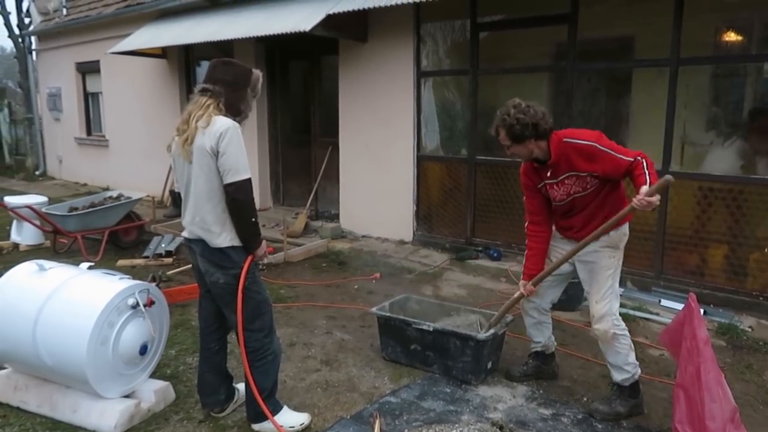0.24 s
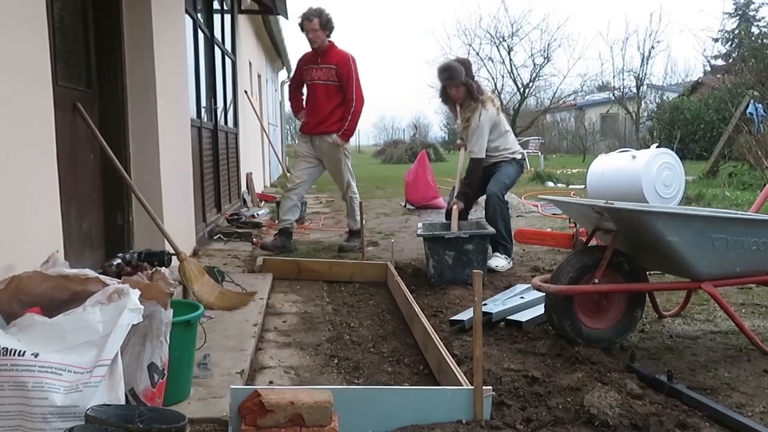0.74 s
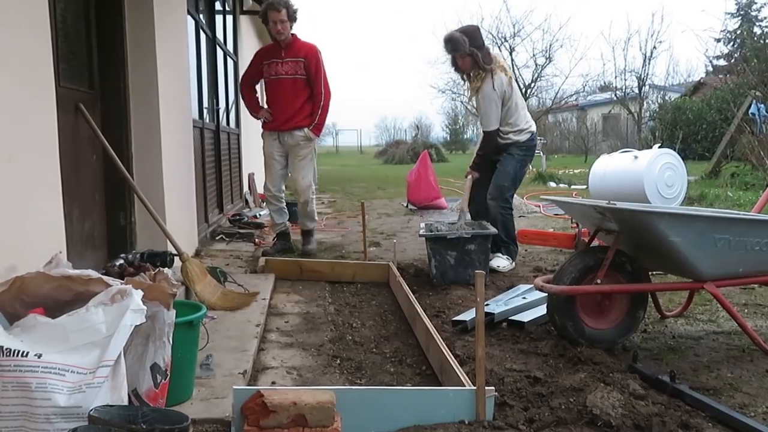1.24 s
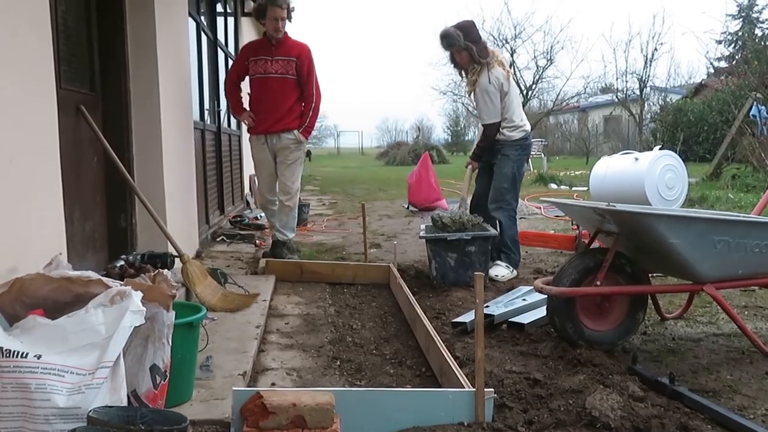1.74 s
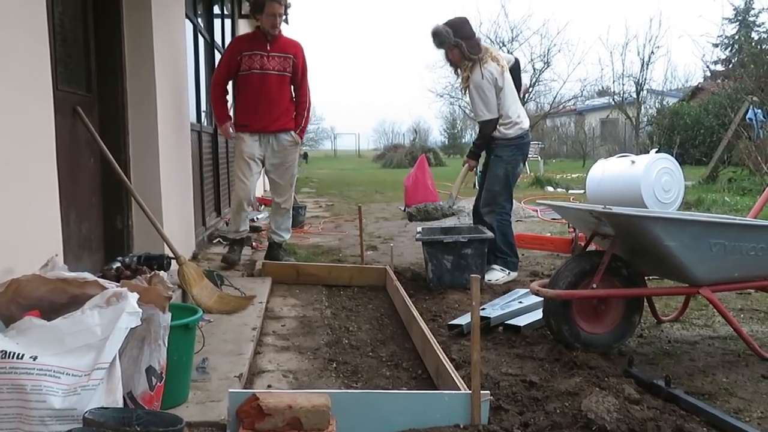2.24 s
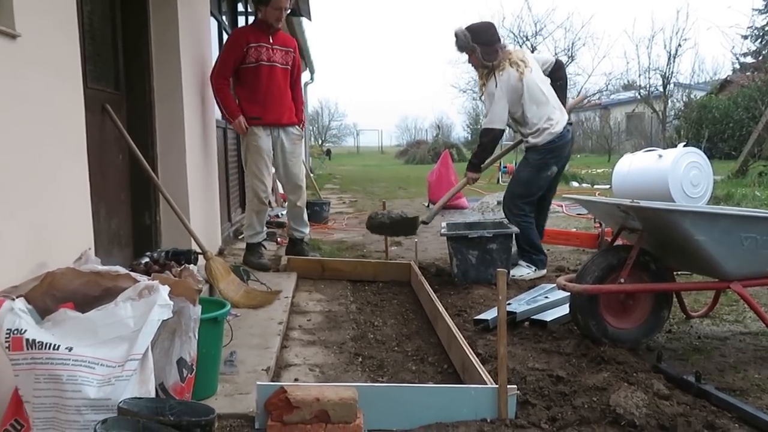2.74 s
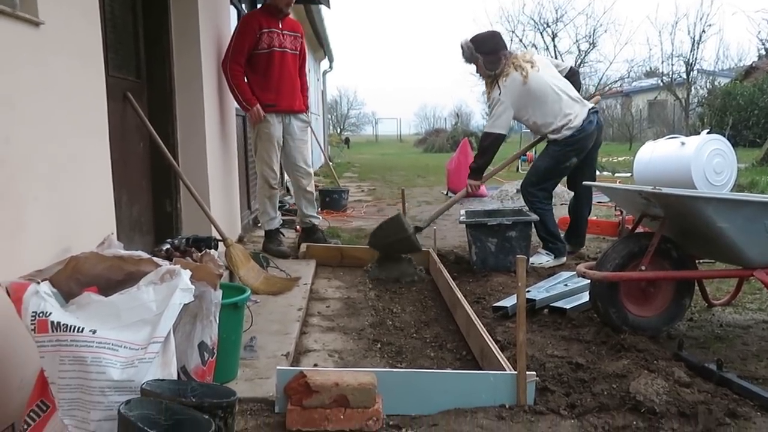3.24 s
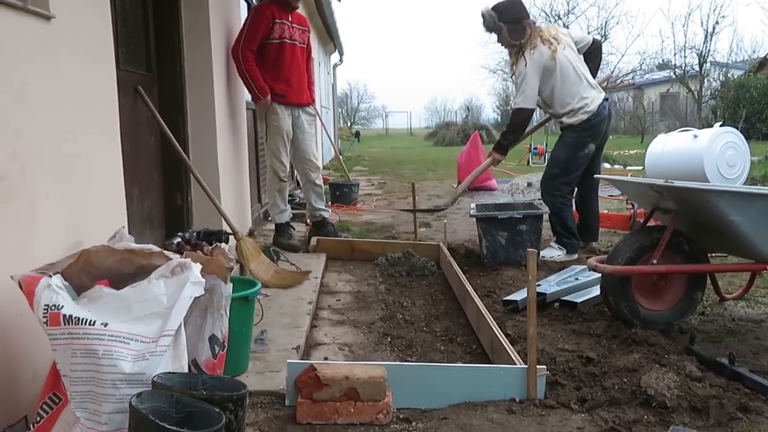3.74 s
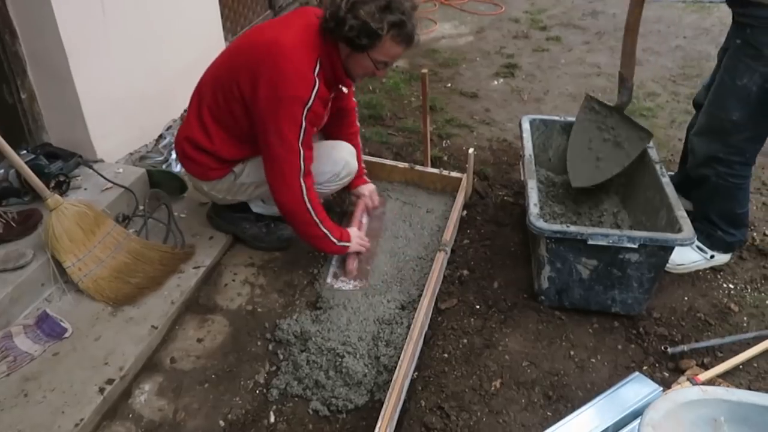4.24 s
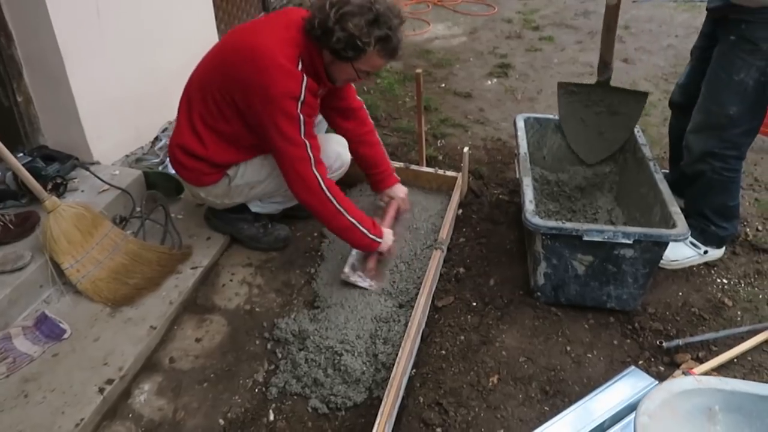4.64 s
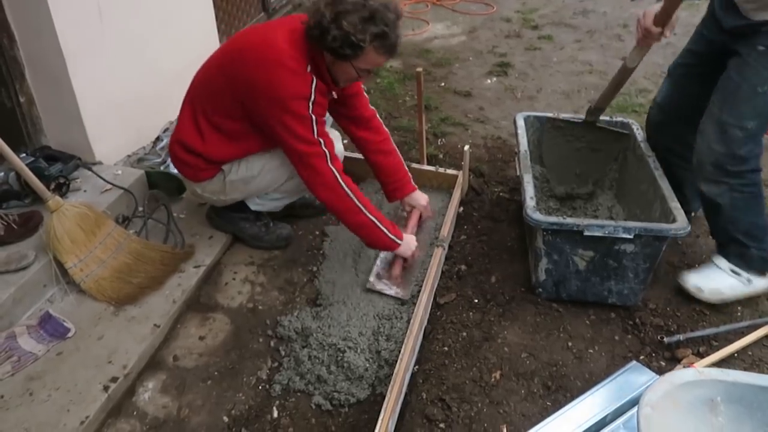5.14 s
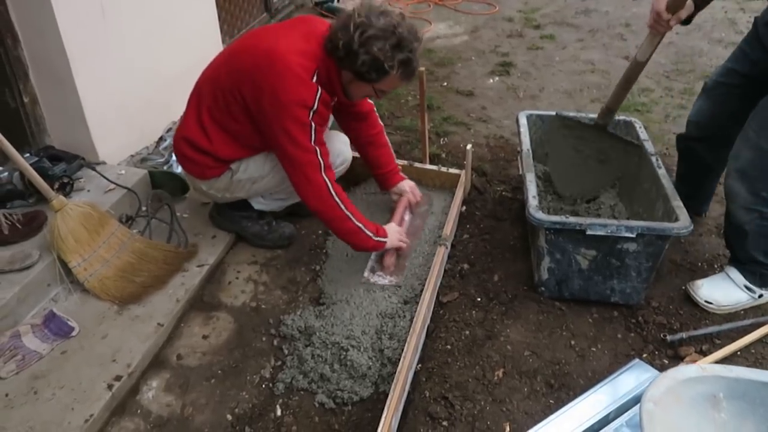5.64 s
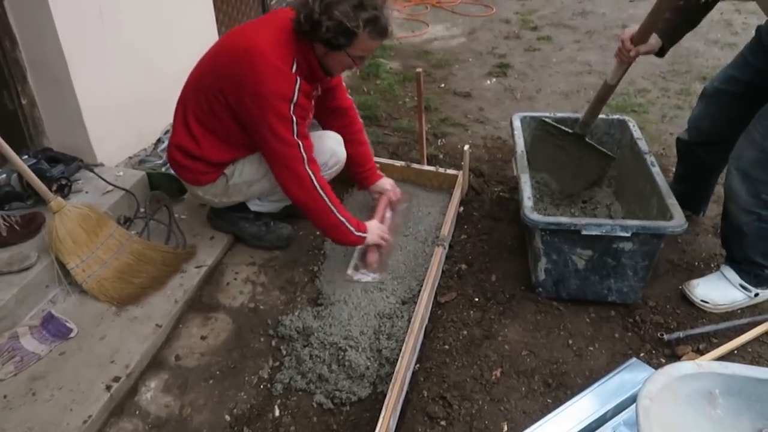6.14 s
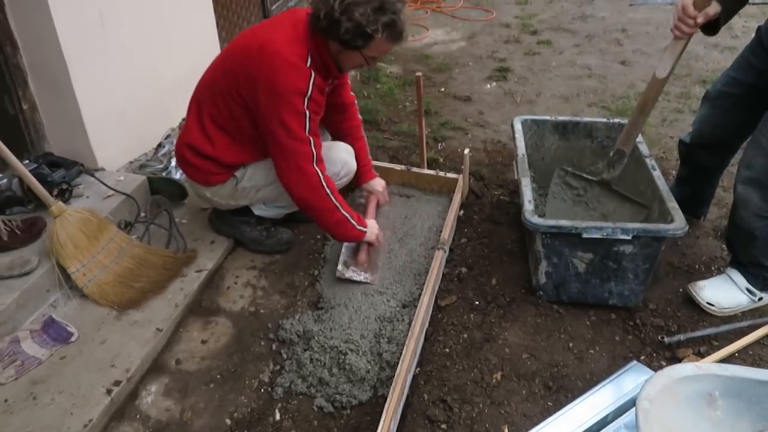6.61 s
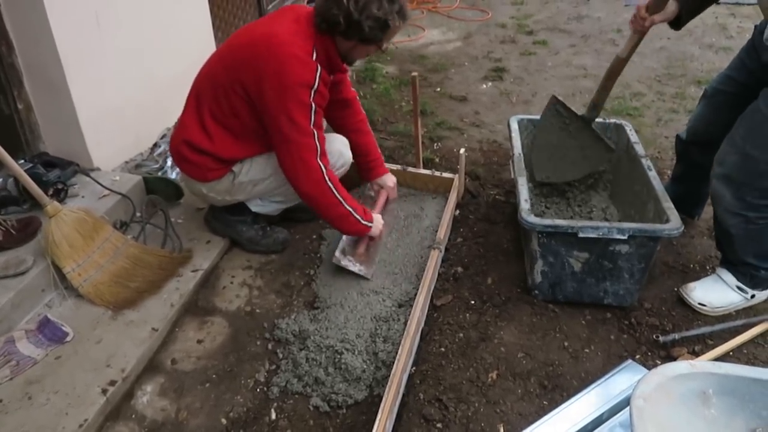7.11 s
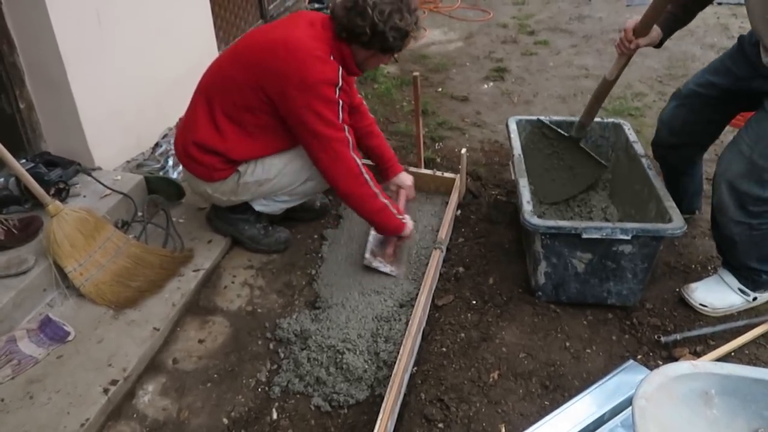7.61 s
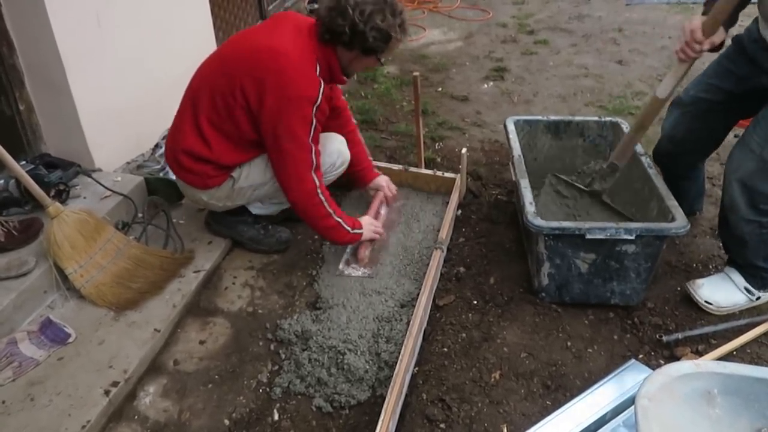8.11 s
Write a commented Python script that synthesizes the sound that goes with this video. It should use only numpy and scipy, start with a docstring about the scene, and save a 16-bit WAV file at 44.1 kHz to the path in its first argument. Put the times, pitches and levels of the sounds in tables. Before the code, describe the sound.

Outdoors, low far traffic rumbles softly. From 0 to 1.3 s a shovel at some distance scrapes gravel and wet concrete in several short coarse strokes, with dull hollow knocks on a plastic tub. From 1.4 to 3 s it is quieter: a small blade tap, a thump near 1.8 s, faint grit and short rubs. Around 3.2 s a loud harsh scrape slides the load out, followed by metallic blade taps at 3.4 and 3.6 s. At 3.95 s the sound cuts to close range, the rumble drops, and a steel trowel sweeps wet concrete in quick, uneven, sandy strokes, two or three a second, until 8.4 s. Underneath, the shovel digs on, the tub booming and knocking, strongly at 6.0 and 6.5 s, with brief stony squeaks near 7.3 s. The trowel rings faintly at 7.9 s, then a hard clustered knock lands at 8.15 s.

```python
"""Shovel and trowel in a yard

In a yard a shovel works gravel and wet concrete in a plastic tub and tips a load out; then, heard from close by,
a steel trowel sweeps the concrete in quick strokes while the shovel digs on and knocks the tub.
Stones scrape steel as dense random clicks under sand fizz; the tub booms as filtered clicks, and knocks
and steel ring as dying sines. Far traffic, slow-filtered noise, rumbles underneath.
"""
import sys
import numpy as np
from scipy import signal
from scipy.io import wavfile
from scipy.ndimage import uniform_filter1d

SR = 44100
rng = np.random.default_rng(int(sys.argv[2]) if len(sys.argv) > 2 else 0)


def pcm_store(signal):
    """Save signal as 16-bit PCM."""
    levels = np.round(np.clip(np.atleast_2d(signal), -1, 1) * 32767)
    wavfile.write(sys.argv[1], SR, levels.astype(np.int16).T)


N = 369116
T = np.arange(N) / SR
CLOSE_S = 3.943  # up to here the shovel is heard from afar, from here on the trowel close by

# The blade knocks the tub: (time [s], peak of the ring [dB], pitch [Hz], t60 [s],
# low thud before a 1 dB cut [dB], slap of wet stones over the knock [dB])
KNOCKS = [(0.258, -24, 167, 0.21, -45, -21), (0.305, -21.5, 158, 0.13, -47, -23),
          (0.515, -31, 290, 0.071, -56, -15), (0.61, -29.5, 200, 0.077, -49, -15),
          (0.801, -26, 205, 0.1, -55, -10), (1.101, -26, 284, 0.18, -47, -11),
          (1.767, -34, 242, 0.12, -41, -24), (4.422, -31, 408, 0.12, -42, -18),
          (4.485, -24.5, 607, 0.14, -43, -15), (4.605, -30, 505, 0.14, -54, -15),
          (4.804, -22, 380, 0.15, -41, -17), (5.058, -34, 360, 0.12, -51, -9),
          (5.444, -40, 545, 0.1, -52, -15), (5.744, -35, 152, 0.21, -50, -13),
          (5.958, -21.5, 320, 0.16, -28.5, -17), (6.267, -25, 572, 0.1, -44, -7),
          (6.469, -16, 393, 0.15, -52, -15), (6.582, -26, 334, 0.12, -50, -18),
          (6.609, -17, 354, 0.092, -49, -15), (6.768, -33, 262, 0.11, -39, -15),
          (6.856, -39, 312, 0.09, -42, -17), (7.252, -23, 163, 0.1, -31, -8),
          (7.35, -20.5, 254, 0.14, -36, -15), (7.494, -28, 306, 0.058, -58, -15),
          (8.044, -25, 510, 0.16, -55, -19), (8.111, -10, 535, 0.12, -48, -24),
          (8.123, -12.5, 466, 0.06, -47, -13), (8.17, -5.5, 291, 0.1, -48, -6),
          (8.184, -12, 312, 0.088, -49, -15), (8.344, -28, 183, 0.091, -36, -17)]


def gain_of(db):
    """Decibels to gain."""
    return 10 ** (np.asarray(db) / 20)


def evened(x):
    """Scales to rms 1."""
    return x / np.sqrt(np.mean(x ** 2) + 1e-20)


def read(points, hz):
    """Reads a spectrum table on a log-frequency axis."""
    f, value = np.transpose(points)
    return np.interp(np.log(hz + 1), np.log(f + 1), value)


def played(rows):
    """Each row swells, holds and dies; powers add, and the loudest row leads the other columns.

    Returns the level, how far the ends drop, how far the held part lies under its top, then the other columns.
    """
    s, held, level_db, change_db, swell, die, *others = np.array(rows, float).T[:, :, None]
    t = T[::64]
    moved_db = change_db * np.clip((t - s) / held, 0, 1)
    before = np.maximum(s - t, 0)
    after = np.maximum(t - s - held, 0)
    drop_db = 20 * (before / swell + after / die)
    power = gain_of(np.maximum(level_db + moved_db - drop_db, -130)) ** 2
    total = power.sum(axis=0)
    lead = power / total
    under_db = np.maximum(change_db, 0) - moved_db
    led = [np.minimum(drop_db, 40), under_db] + others
    curves = [10 * np.log10(total)] + [(lead * c).sum(axis=0) for c in led]
    return [np.interp(T, t, c) for c in curves]


def smoothed(x, size, axis=-1):
    """Averages over a sliding stretch."""
    return uniform_filter1d(x, size=size, axis=axis)


def coloured(x, spectrum, patchy_db, size, modes_db=0):
    """Filters by a spectrum whose broad humps and narrow modes come and go at random,
    as the touching part of a surface changes."""
    hz, t, z = signal.stft(x, SR, nperseg=size, noverlap=size * 3 // 4)
    wide, narrow = rng.standard_normal((len(t), len(hz), 2)).T
    wide = evened(smoothed(smoothed(wide, 9, axis=0), 9, axis=1))
    narrow = evened(smoothed(smoothed(narrow, 2, axis=0), 10, axis=1))
    z = z * gain_of(read(spectrum, hz)[:, None] + patchy_db * wide + modes_db * narrow)
    return evened(signal.istft(z, SR, nperseg=size, noverlap=size * 3 // 4)[1][:len(x)])


def grit(per_s, uneven_db, size):
    """Random clicks of both signs; a few are much larger."""
    chance = rng.random(size)
    weight = np.minimum(rng.exponential(1, size), 5)
    sign = rng.standard_normal(size)
    return (chance < per_s / SR) * gain_of(uneven_db * weight) * sign


def resonate(x, hz, width):
    """Shifts the curve hz down to zero, smooths, and shifts back: a resonance of gain 1."""
    turn = np.exp(2j * np.pi * np.cumsum(hz * np.ones(len(x))) / SR)
    r = np.exp(-np.pi * width / SR)
    return 2 * (turn * signal.lfilter([1 - r], [1, -r], x * turn.conj())).real


def add(mix, s, sound):
    """Adds a sound at a time."""
    part = mix[round(s * SR):][:len(sound)]
    part += sound[:len(part)]


def yard():
    """Far traffic: a low rumble and drone alike in both ports, and soft, low-weighted microphone noise that differs."""
    # How loud the background is, before each layer's own gain: (time [s], level [dB])
    traffic = [(0, -48), (.6, -50), (1.0, -46.5), (1.5, -43), (2.0, -47), (2.5, -46), (3.3, -49),
               (3.92, -49), (3.96, -58), (4.27, -64), (4.8, -56), (5.7, -62), (6.6, -57), (7.37, -53),
               (7.8, -60), (8.37, -58)]
    # Spectrum of the part alike in both ports: (frequency [Hz], level per Hz [dB])
    alike = [(12, -41), (20, -34), (38, -4.5), (59, -10), (106, -12), (126, -11.5), (150, -24),
             (382, -22.5), (519, -28), (686, -29), (1100, -37), (1580, -35), (6020, -49), (15500, -63)]
    # Spectrum of the part that differs between the ports: (frequency [Hz], level per Hz [dB])
    differing = [(24, -52), (40, -17), (188, 0), (387, -1), (838, -10), (1680, -14), (3060, -18),
                 (3740, -26), (11500, -35), (15500, -47)]
    level = gain_of(np.interp(T, *np.transpose(traffic)))
    mid = coloured(rng.standard_normal(N), alike, 1.65, size=2048)
    side = coloured(rng.standard_normal(N), differing, 1.65, size=2048)
    # engines far off: noise passed twice through one peak
    drone_hz, pass_width_hz, drone_db = 65, 30, -6
    peak = signal.iirpeak(drone_hz, drone_hz / pass_width_hz, SR)
    drone = evened(signal.lfilter(*peak, signal.lfilter(*peak, rng.standard_normal(N))))
    return level * (gain_of(-1.5) * mid + gain_of(drone_db) * drone), level * gain_of(-8) * side


def scrape(strokes, heard, stones, per_s, uneven_db, patchy_db, modes_db, hollow, judder_db):
    """Stones click against the blade, sand fizzes above them, and the hollow under the blade lifts one band."""
    # Fine sand on steel: (frequency [Hz], level per Hz [dB])
    sand = [(120, -35), (1100, -6), (2500, -3), (4500, 0.5), (6000, -1.5), (9000, -3), (12000, -4),
            (14000, -9.5), (16000, -19.5)]
    fizz_edge = .07  # share of the drop at a stroke's ends by which fizz falls more than the stones
    fizz_flat = .45  # share of the change while held that fizz ignores
    pressure_db, drop_db, under_db, fizz_db, hollow_hz = (c[heard] for c in played(strokes))
    n = len(pressure_db)
    clicks = grit(per_s, uneven_db, size=n)

    rubbing = evened(clicks) + .6 * rng.standard_normal(n)  # wet paste fills the gaps between clicks
    rubbing = rubbing + hollow * resonate(rubbing, hollow_hz, 1300)
    body = coloured(rubbing, stones, patchy_db, size=1024, modes_db=modes_db)

    grains = evened(clicks) + 0.32 * evened(grit(250, 2.5, size=n)) + 1.3 * rng.standard_normal(n)
    fizz = coloured(grains, sand, 1.5, size=512, modes_db=2.4)
    fizz_gain = gain_of(fizz_db + fizz_flat * under_db - fizz_edge * drop_db)

    judder = evened(smoothed(smoothed(rng.standard_normal(n), 500), 500))  # the blade catches and slips
    out = np.zeros(N)
    out[heard] = gain_of(pressure_db + judder_db * judder) * (body + fizz_gain * fizz)
    return out


def shovel():
    """The shovel, from afar, drags its blade through gravel and wet concrete."""
    # One row a stroke, the first is grit that keeps settling: (full pressure reached [s], held [s],
    # pressure [dB], change while held [dB], time to swell 20 dB [s], time to die 20 dB [s],
    # sand fizz over the stones before its shaping [dB], pitch of the hollow under the blade [Hz])
    strokes = [(0, 3.94, -62, 3, .01, .002, -3, 1400), (0, .1, -43, -1, .01, .15, -6, 1700),
               (.304, .07, -38, -3, .2, .2, -15, 1350), (.564, .08, -35, 3.5, .22, .11, -9, 2100),
               (.794, .116, -37.5, -5, .09, .09, -12, 1330), (1.1, .014, -37, -1, .022, .055, -15, 1100),
               (1.184, .01, -44.5, -1, .24, .2, -6.5, 1700), (1.33, .01, -50, -1, .15, .45, -4, 1540),
               (1.605, .01, -55, -1, .05, .07, 1, 1770), (1.68, .01, -57, -1, .04, .05, 2, 1770),
               (1.84, .19, -46, -2, .065, .4, -18, 1520), (2.364, .01, -46, -1, .09, .1, -12, 1200),
               (2.496, .014, -50, -1, .012, .09, 9, 2600), (3.05, .1, -43, 6, .3, .05, -3, 1800),
               (3.16, .08, -38, 5, .05, .05, 2, 2200), (3.275, .03, -23.5, 1.5, .17, .06, -6, 1900),
               (3.35, .025, -32, 1, .05, .04, -7, 1410), (3.42, .16, -43.5, -1, .05, .11, -6, 1700),
               (3.63, .08, -45, -8, .03, .06, -2, 1030)]
    # Stones on the shovel: (frequency [Hz], level per Hz [dB])
    stones = [(350, -28), (600, -31), (711, -3.5), (1140, -3.5), (1240, 0), (1700, -4.5), (2680, -1.5),
              (3940, -7.5), (9000, -25), (11700, -50), (19800, -120)]
    return scrape(strokes, T <= CLOSE_S, stones, per_s=7000, uneven_db=1.0, patchy_db=1.6,
                  modes_db=2.3, hollow=1.35, judder_db=1.)


def digging():
    """Lumps of mix bump along the tub; the wall they press on booms most."""
    # The mix dragged along the tub walls, one row a drag: (full [s], held [s], level before a 4 dB cut [dB],
    # change while held [dB], time to swell 20 dB [s], time to die 20 dB [s], pitch of the wall that booms most [Hz])
    drags = [(0, .02, -29.5, -1, .01, .3, 255), (.3, .08, -27, -4, .15, .15, 205),
             (.47, .04, -40, 2, .2, .1, 330), (.63, .12, -38, -6, .05, .1, 250),
             (.82, .1, -33, -1, .05, .17, 270), (1.1, .03, -32.5, -2, .03, .25, 270),
             (1.48, .01, -45, -1, .25, .11, 230), (1.78, .35, -43, 1, .02, .13, 260),
             (2.36, .01, -47.5, -1, .9, .35, 230), (2.53, .01, -42, -1, .03, .11, 200),
             (2.91, .15, -43, -1, .09, .1, 260), (3.2, .06, -39, 1, .3, .2, 410),
             (3.3, .01, -33.5, -1, .19, .14, 340), (3.63, .01, -34.5, -1, .02, .125, 400),
             (3.5, .44, -53, 2, .07, .002, 240), (3.944, .01, -33.5, -1, .001, .14, 340),
             (4.18, .14, -44, -1, .4, .2, 510), (4.42, .32, -36, -1, .15, .1, 420),
             (4.82, .08, -27, -1, .13, .4, 440), (5.08, .005, -24.5, -1, .1, .035, 337),
             (5.18, .01, -29, -1, .23, .28, 480), (5.62, .01, -28, -1, .15, .125, 420),
             (5.76, .18, -40, -2, .1, .02, 400), (5.96, .12, -19, -7, .008, .12, 330),
             (6.32, .29, -24, 2, .15, .13, 390), (6.79, .09, -27, -2, .09, .22, 310),
             (7.08, .1, -33, -1, .25, .3, 520), (7.26, .09, -26, 2, .015, .075, 280),
             (7.48, .03, -28, -1, .04, .12, 300), (7.55, .4, -34, 1, .2, .3, 530),
             (8.03, .06, -27, 1, .06, .05, 330), (8.18, .04, -14, -8, .015, .1, 310),
             (8.3, .07, -33, 2, .2, .1, 280)]
    # The plastic tub: (frequency [Hz], level per Hz [dB])
    tub = [(29, -57), (50, -40), (102, -31), (160, -1), (286, -2.5), (367, -3), (416, -4.5), (534, -1.5),
           (637, -1.5), (1000, -3.5), (1300, -73), (2200, -120)]
    # every knock also shakes the mix in the tub, at a pitch midway to that of the wall
    shake_db, swell_s, die_s, shaken_wall_hz = -5.5, .01, .07, 340
    shakes = [(s, .01, db + shake_db, -1, swell_s, die_s, np.sqrt(hz * shaken_wall_hz))
              for s, db, hz, *_ in KNOCKS]
    level_db, *_, wall_hz = played(drags + shakes)
    rasp = coloured(grit(1500, 1.8, size=N), tub, 1.5, size=2048, modes_db=1.5)
    boom = evened(resonate(resonate(rasp, wall_hz, 320), wall_hz, 324))
    return gain_of(level_db - 4.0) * evened(1.13 * rasp + boom)


def singing():
    """Rubbing noise through one resonance, for as long as the stone is in touch."""
    # A single stone drags or catches on a blade or wall and one of its resonances stands out:
    # (time [s], length [s], pitch [Hz], width [Hz], level at the start [dB], change over the length [dB])
    stones = [(0.541, 0.14, 2600, 138.9, -44, -3), (0.536, 0.15, 3550, 150, -45, 5),
              (6.031, 0.054, 1450, 216, -20.5, 3), (7.238, .022, 2800, 700, -24, -12),
              (7.267, 0.026, 4300, 160, -30, 6), (7.28, .078, 1410, 185.2, -23.5, 12),
              (7.31, .05, 590, 70, -27, 2), (7.335, 0.023, 2830, 180, -19.5, -6),
              (3.333, 0.046, 1520, 83.33, -33, 1), (4.881, .1, 560, 40, -29, -10),
              (5.398, 0.22, 568, 37.04, -47, 7), (0, 0.12, 250, 55.56, -34, -16),
              (6.301, .15, 545, 54, -35, 4.5), (.022, 0.01, 3000, 1667, -34, -11),
              (.057, 0.0096, 3500, 1667, -35, -11), (0.516, .015, 900, 648.1, -31, -10),
              (3.433, 0.016, 1000, 185.2, -37.5, -5), (5.012, .025, 2900, 500, -22, 0),
              (4.047, 0.047, 3870, 200, -30, 0), (4.15, 0.046, 2640, 270, -25, 5.5)]
    out = np.zeros(N)
    for s, length, hz, width, level_db, change_db in stones:
        t = np.arange(0, length, 1 / SR)
        noise = rng.standard_normal(SR // 4)[:len(t) + SR // 50]
        tone = resonate(noise, hz, width)[-len(t):]  # the lead-in lets the resonance build up
        level = gain_of(level_db + change_db * t / length)
        add(out, s, level * evened(tone) * signal.windows.tukey(len(t), .06))
    return out


def knocks():
    """Each knock is a dull ring of three wall modes over a low thud, with a wet slap on top."""
    out, t = np.zeros(N), np.arange(SR // 3) / SR
    rise = 1 - np.exp(-t / 0.0013)
    thud = np.sin(2 * np.pi * 85 * t) * gain_of(-60 * t / 0.25) * rise
    push = np.maximum(t - .003, 0)
    # the weight lands in one short swing
    thud = thud + 5.3 * np.sin(2 * np.pi * 270 * push) * gain_of(-60 * push / 0.031)
    short = SR // 12
    spots = rng.random((len(KNOCKS), 3))
    for (s, db, hz, t60, thud_db, slap_db), (a, b, c) in zip(KNOCKS, spots):
        ring = np.sin(2 * np.pi * hz * t)
        ring += 0.26 * np.sin(2 * np.pi * (hz * (1.45 + 0.24 * a) * t + b))
        ring += 0.27 * np.sin(2 * np.pi * hz * (0.71 + .15 * c) * t)
        ring *= gain_of(-60 * t / np.clip(t60, .02, .5)) * rise
        slap = evened(resonate(resonate(rng.standard_normal(short), 900, 1400), 900, 1400))
        slap = slap * gain_of(-60 * t[:short] / .06)
        add(out, s, gain_of(db) * ring / abs(ring).max() + gain_of(thud_db - 1.0) * thud)
        add(out, s, gain_of(db + slap_db) * slap)
    return out


def taps():
    """The steel blade rings briefly in its modes, struck at a different spot each time, and sheds a rattle of grit."""
    # The emptied shovel blade is tapped: (time [s], peak of the ring [dB])
    times = [(1.421, -34), (3.37, -23.5), (3.435, -37), (3.628, -18.5)]
    # Modes of the blade: (pitch [Hz], least relative level, each tap adds up to 4.6 dB [dB], t60 [s])
    modes = [(347, -12, 0.2), (462, -1, 0.17), (610, -5.5, 0.2), (854, 7.5, 0.13), (935, -3, 0.17),
             (1288, -9, 0.22), (1540, -3, 0.14), (1910, -6, 0.12), (2410, -29, .08), (2730, -24, .06)]
    out, t = np.zeros(N), np.arange(SR // 3) / SR
    spots = rng.random((len(times), len(modes), 2))
    for (s, peak_db), spot in zip(times, spots):
        ring = np.zeros(len(t))
        for (hz, db, t60), (a, b) in zip(modes, spot):
            ring += gain_of(db + 4.6 * a - 60 * t / t60) * np.sin(2 * np.pi * (hz * t + 0.37 * b))
        rattle = evened(resonate(resonate(rng.standard_normal(len(t)), 1200, 2000), 1200, 2000))
        rattle = rattle * gain_of(-17.5 - 60 * t / 0.2)
        add(out, s, gain_of(peak_db) * (ring / abs(ring).max() + rattle))
    return out


def trowel():
    """The steel trowel, close by, sweeps the concrete in quick strokes over a faint steady scrape."""
    # One row a stroke, the first is a faint steady scrape under them all: (full pressure reached [s],
    # held [s], pressure [dB], change while held [dB], time to swell 20 dB [s], time to die 20 dB [s],
    # sand fizz over the stones before its shaping [dB], pitch of the hollow under the blade [Hz])
    strokes = [(3.944, 4.43, -48, 1, .001, .01, -10, 1600), (3.944, .035, -31, 2, .001, .05, -11, 1500),
               (4.01, .07, -14, -1, .055, .12, -12, 1620), (4.12, .15, -19, -5.5, .1, .04, -10, 1900),
               (4.409, .158, -24.5, 6, .14, .065, -9, 1940), (4.7, .185, -21.5, 2.5, .08, .09, -8, 1820),
               (5.022, .008, -14.5, -1, .085, .035, -16, 1500), (5.07, .005, -21.5, -1, .1, .05, -15, 1200),
               (5.15, .03, -28, 1, .1, .05, -17, 1200), (5.21, .03, -17, 1, .05, .04, -12, 1510),
               (5.28, .116, -12.5, -6.5, .04, .15, -13, 1600),
               (5.602, .215, -29.5, 8.5, .3, .07, -10, 2200), (5.975, .02, -19.5, -1, .08, .05, -1, 1900),
               (6.02, .05, -18, 2, .1, .075, -13, 1400), (6.15, .01, -28, -1, .1, .06, -13, 1550),
               (6.31, .084, -18, 1.5, .2, .08, -10, 2100), (6.56, .14, -19, -.5, .24, .09, -10, 2100),
               (6.816, .135, -22.5, 4, .12, .05, -8, 2300), (7.085, .085, -16, -4, .08, .05, -7, 2600),
               (7.285, .062, -22.5, -.5, .06, .035, -6, 1450), (7.38, .03, -35, -1, .05, .25, -10, 1420),
               (7.482, .06, -32, 3.5, .045, .1, -11, 1850), (7.615, .04, -14, -1, .1, .1, -12, 1700),
               (7.71, .06, -16, -2, .15, .15, -12, 1800), (7.864, .01, -20, -1, .15, .28, -11, 1650),
               (8.056, .156, -22.5, 1.5, .06, .07, -9, 1800), (8.27, .1, -27, 3.5, .1, .1, -7.5, 1900)]
    # Stones on the trowel: (frequency [Hz], level per Hz [dB])
    stones = [(290, -56), (500, -24), (544, -9), (904, -10), (1110, 1), (1500, 0.5), (2750, -1.5),
              (3100, -3), (3940, -3.5), (4570, -12), (9000, -25.5), (11700, -99), (19800, -120)]
    return scrape(strokes, T > CLOSE_S, stones, per_s=7000, uneven_db=1.2, patchy_db=1.76,
                  modes_db=2.4, hollow=.8, judder_db=.5)


def trowel_ring():
    """The lowest mode of the free blade, with a slight beat from its near twin."""
    # The lifted trowel is bumped and rings free: (time [s], level of the main mode [dB], pitch [Hz], t60 [s])
    bump = (7.855, -23, 555, .6)
    s, level_db, hz, t60 = bump
    out, t = np.zeros(N), np.arange(SR // 3) / SR
    modes = np.sin(2 * np.pi * hz * t) + 0.16 * np.sin(2 * np.pi * (hz + 19) * t)
    add(out, s, gain_of(level_db - 60 * t / t60) * modes)
    return out


def ports(x, slant):
    """The difference between two close ports: a fixed phase-turned part plus sound scattered from ever-changing sides."""
    # Side over mid before the slant and scatter factors: (frequency [Hz], level [dB])
    spread = [(60, -31), (110, -50), (200, -34), (380, -38), (700, -26.5), (1290, -27), (2380, -23),
              (4400, -8.3), (8120, -6), (15000, -1.5)]
    hz, t, z = signal.stft(x, SR, nperseg=256, noverlap=128)
    scattered = 1.22 * np.exp(2j * np.pi * rng.random(z.shape[::-1]).T)
    z = z * gain_of(read(spread, hz))[:, None] * (1j * slant + .06 + scattered)
    return signal.istft(z, SR, nperseg=256, noverlap=128)[1][:N]


def scene():
    """Sums the sources; near sounds differ between the two ports mostly in the treble."""
    far, wide = yard()
    work = shovel() + digging() + singing() + knocks() + taps() + trowel() + trowel_ring()
    side = ports(work, slant=-0.28) + wide
    return np.array([work + far + side, work + far - side])


def record(dry):
    """The small microphone loses the deepest bass, rounds the highest peaks, and has a band limit."""
    edge_hz = 15850
    thin = signal.sosfilt(signal.butter(3, 42, "high", fs=SR, output="sos"), dry)
    rounded = np.tanh(thin)
    band = signal.firwin(511, edge_hz, window=("kaiser", 9), fs=SR)
    return signal.oaconvolve(rounded, band[None], "same")


dry = scene()
out = record(dry)
pcm_store(out)
```